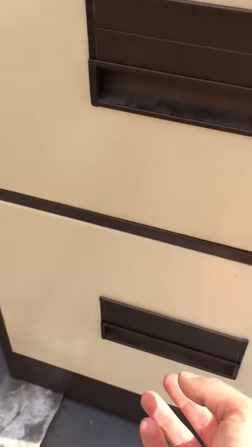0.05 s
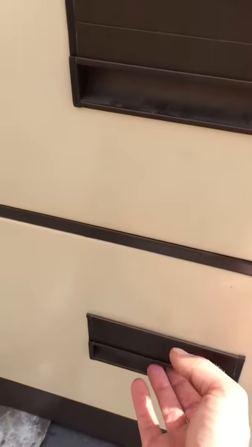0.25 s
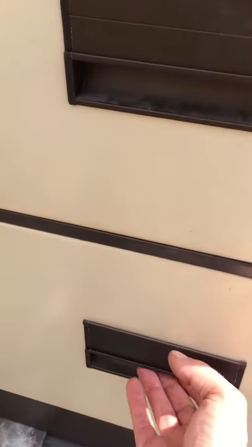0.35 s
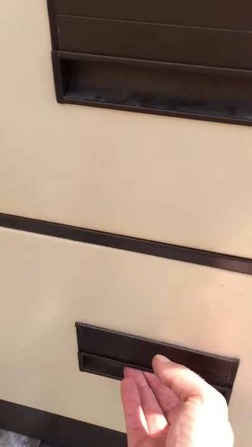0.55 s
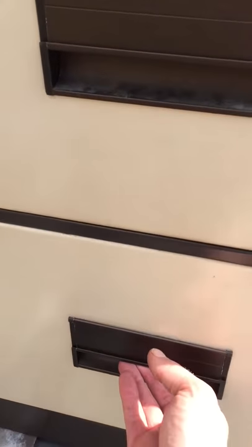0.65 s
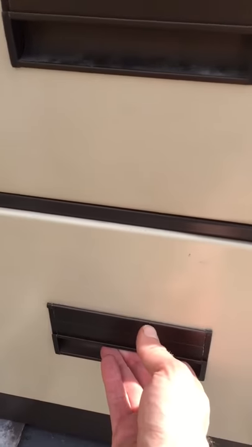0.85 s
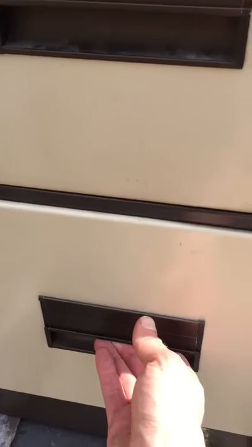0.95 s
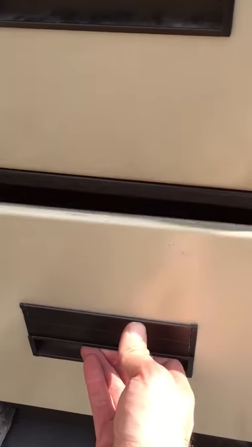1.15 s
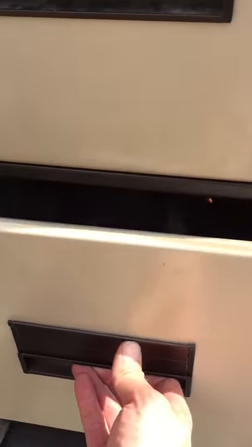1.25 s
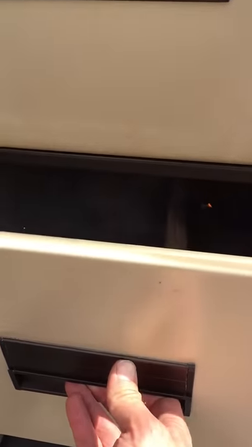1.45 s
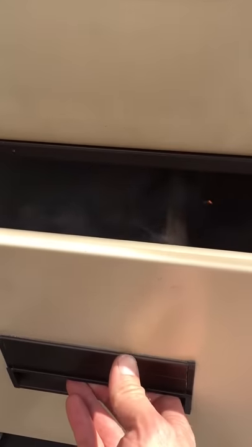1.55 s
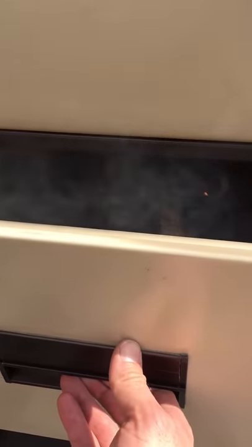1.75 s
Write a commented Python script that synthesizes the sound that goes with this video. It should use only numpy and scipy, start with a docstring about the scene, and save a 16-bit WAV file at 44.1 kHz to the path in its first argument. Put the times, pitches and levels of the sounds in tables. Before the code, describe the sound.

Ringing metal clanks from a cabinet handle and latch, then a hollow drawer rolling out.

```python
"""A steel filing cabinet, opened by hand, outdoors, close by.
The handle clanks on the drawer front and sets its spring singing; the latch lets go with a clang
and a rattle. Each contact rings the dense modes of the sheet steel plus the struck part's own.
The drawer rolls out, booming over bumps and scraping on grit, with one short runner squeak.
Embers inside tick faintly over a low outdoor rumble."""
import sys
import numpy as np
from scipy import signal
from scipy.fft import rfft, irfft
from scipy.io import wavfile
from scipy.ndimage import uniform_filter1d

SR = 44100
rng = np.random.default_rng(int(sys.argv[2]) if len(sys.argv) > 2 else 0)


def file_out(sig):
    """Save sig as 16-bit WAV at sys.argv[1]."""
    # one column per channel
    cols = np.atleast_2d(sig).T
    # limit, then scale
    lim = np.clip(cols, -1, 1)
    pcm = np.round(lim * 32767).astype(np.int16)
    wavfile.write(sys.argv[1], SR, pcm)


N = 79380
TIME_S = np.arange(N) / SR

# outdoor air spectrum: f/Hz, density/dB
AIR_SPECTRUM = [(20, -34.5), (60, 0.5), (220, -7), (450, -20), (1000, -23), (6000, -41.5), (15500, -46)]
# ember snaps: t/s, level/dB, f/Hz
EMBER_SNAPS = [(0.135, -50, 13700), (1.601, -47, 9400)]
# drawer travel: t/s, rumble level/dB, scrape level/dB
ROLL_LEVELS = [(.76, -65.5, -71.5), (0.842, -44.5, -40.5), (1.0, -44.5, -99), (1.112, -54, -57),
               (1.147, -41.5, -44), (1.199, -36, -46.5), (1.246, -31, -38), (1.3, -32.5, -41.5),
               (1.385, -29, -41.5), (1.53, -35.5, -51.5), (1.62, -37.5, -62.5), (1.8, -46, -91)]
# hollow drawer modes: f/Hz, relative level/dB, t60/s
BOX_MODES = [(65, -4, 0.067), (105.6, -2, 0.3), (147.4, -2, 0.05), (187.9, 0.5, 0.35), (223.4, 1, 0.1),
             (263.7, 1, 0.2), (334, 0, 0.035)]
# runner grit spectrum: f/Hz, density/dB
SCRAPE_SPECTRUM = [(200, -0.5), (800, 4.5), (1400, 0), (3200, -6.5), (5500, -24), (8000, -25), (15500, -37)]
# sheet steel spectrum: f/Hz, density/dB
SHEET_SPECTRUM = [(100, -18.5), (270, -15.5), (520, -8), (1280, -8), (1550, -4), (2100, 0), (2900, -5),
                  (4900, -12), (5600, -10.5), (7800, -17), (8700, -15), (10500, -23.5), (15500, -23.5)]
# sheet steel decay: f/Hz, t60/s
SHEET_DECAY = [(150, .25), (600, .13), (1800, .2), (4000, .21), (6500, .19), (9500, .135), (15000, .115)]
# sheet antiresonances: f/Hz
ANTIRESONANCES_HZ = [520, 920, 1310, 2380, 2880, 4130, 4780, 8030]
# clear modes, by part: f/Hz, relative level/dB, t60/s
CLEAR_MODES = { "handle": [(265, -12, .1), (325, -14, .14), (1008, -18, .28), (1145, -19, .5),
               (1462, -12, .22), (1512, -10, .25), (1590, -11, .24), (1670, -8, .2), (1935, -7, .2),
               (2168, 3, .06), (2592, -12, .22), (3943, -14, .2)], "stop": [(345, -14, .33),
               (1013, -11, .2), (1090, 0, .06), (1145, -9, .33), (1586, -6, .3), (1672, -5, .34),
               (1760, 0, .1), (1957, -6, .26), (2036, -8, .5), (2487, -9, .25), (2750, -19, .45),
               (3077, -9, .25), (3320, -17, .45), (3608, -10, .36), (5249, -17, .4)],
               "latch": [(745, 0, .055), (1390, 9, .04), (1863, -19, .5), (2033, -14, .5), (2297, -2, .28),
               (2424, -10, .22), (3068, -7, .33), (3658, -12, .55), (3864, -15, .42), (5497, -21, .7)],
               "keeper": [(1330, 7, .04), (2280, -3, .2)], "grip": [], "runner": []}
# weaker overtones, by part: f/Hz
OVERTONES_HZ = { "grip": [1257, 1668, 1717, 1897, 2683, 2928, 4629, 6042, 6915], "handle": [1991, 2559,
                3245, 3644, 4377, 4503, 5369, 5905, 6034, 6729, 7105, 8029, 8500], "stop": [2563, 3246,
                4645, 5334, 6333, 6495], "latch": [1140, 1522, 4298, 4365, 5243, 5780, 6029, 6871, 7542],
                "keeper": [872, 1194, 1549, 2634, 2781, 3041, 6575], "runner": []}
# overtone offset from the sheet spectrum, by part: level/dB
OVERTONE_OFFSET_DB = {"grip": -2, "handle": -10, "stop": -6, "latch": -7, "keeper": -4}
# metal contacts: t/s, part, level/dB, bass/dB, clunk/dB, treble/dB, ring/dB
CONTACTS = [(.164, "grip", -42, 11, 1, -14.5, -2), (0.1948, "grip", -26, -11, -9, -1.5, -11),
            (0.2001, "grip", -25, -1, 6, 6.5, 2), (0.2222, "grip", -34.5, 1, 2.5, 10.5, -1),
            (0.2607, "handle", -14.5, -1, -0.5, 2.5, 1), (0.4134, "stop", -27, 8.5, 10, -8.5, -11.5),
            (0.4237, "stop", -20.5, -6, 1.5, -9.5, -1.5), (.454, "stop", -24, 1, -13, -10, -25),
            (.752, "runner", -51.5, -23, 12, -19, 4.5), (0.844, "latch", -19.5, 4.5, 5.5, -3, 1.5),
            (.903, "latch", -29.5, 12, 6, -12, -10), (.920, "latch", -30.5, 5, 7, -7.5, -26),
            (.9445, "keeper", -30.5, -17, 4, -8, 2), (.958, "latch", -29, -4, 1.5, -9, -4.5),
            (.973, "latch", -34.5, 0, 6, -1, -6), (1.0235, "latch", -36.5, -14, 11.5, 1, -3),
            (1.152, "runner", -46.5, 11, -18, -1, -4), (1.22, "runner", -38.5, 12, 3, -10.5, 0),
            (1.243, "runner", -36, 10, 6, -24, 0), (1.314, "runner", -52, 3, 0, 11, 0)]


def from_db(db):
    """Decibels to gain."""
    return 10 ** (np.asarray(db) / 20)


def unit_rms(x):
    """Scale to RMS 1."""
    return x / np.sqrt(np.mean(x ** 2) + 1e-20)


def at_hz(points, hz):
    """Interpolate a table over log frequency."""
    table_hz, values = np.transpose(points)
    return np.interp(np.log(np.maximum(hz, 1)), np.log(table_hz), values)


def colour(x, spectrum):
    """Apply a spectrum; RMS 1."""
    gain = from_db(at_hz(spectrum, np.fft.rfftfreq(N, 1 / SR)))
    return unit_rms(irfft(rfft(x) * gain, N))


def decay(t, t60_s):
    """Exponential fall, 60 dB per t60_s."""
    return np.exp(-float(np.log(1000)) * t / t60_s)


def add(out, start_s, sound):
    """Mix in at start_s."""
    i = int(start_s * SR)
    out[i:i + len(sound)] += sound[:N - i]


def clicks(per_s, spread_db):
    """Random impulses of uneven size."""
    sizes = from_db(spread_db * np.minimum(rng.exponential(1, N), 4)) * rng.choice([-1, 1], N)
    return sizes * (rng.random(N) < per_s / SR)


def scatter(count, spread_db):
    """Log-normal factors, clipped at 2 sigma."""
    return from_db(spread_db * np.clip(rng.standard_normal(count), -2, 2))


def air(level_db=-52.5):
    """Low outdoor rumble, faint hiss."""
    return from_db(level_db) * colour(rng.standard_normal(N), AIR_SPECTRUM)


def embers(tau_s=0.0045):
    """Tiny bright snaps: fast-decaying bursts of band noise."""
    out, t = np.zeros(N), TIME_S[:SR // 20]
    for start_s, db, hz in EMBER_SNAPS:
        band = signal.butter(1, [0.46 * hz, min(1.6 * hz, 20000)], "band", fs=SR, output="sos")
        snap = unit_rms(signal.sosfilt(band, rng.standard_normal(len(t))))
        add(out, start_s, from_db(db) * snap * np.exp(-t / tau_s))
    return out


def friction(peak_s, half_width_s, hz, bandwidth_hz, level_db):
    """Rubbing swells and fades in one resonance."""
    radius = np.exp(-np.pi * bandwidth_hz / SR)
    feedback = [1, -2 * radius * np.cos(2 * np.pi * hz / SR), radius ** 2]
    tone = signal.lfilter([1, 0, -1], feedback, rng.standard_normal(N))
    swell = np.exp(-((TIME_S - peak_s) / half_width_s) ** 2)
    return from_db(level_db) * unit_rms(tone) * swell


def drawer():
    """Runner bumps make the box boom, duller as it slows; grit scrapes under the rollers."""
    times_s, rumble_db, scrape_db = np.transpose(ROLL_LEVELS)
    rumble_db = np.interp(TIME_S, times_s, rumble_db)
    scrape_db = np.interp(TIME_S, times_s, scrape_db)
    tilt_db_per_octave = 0.52 * (rumble_db - rumble_db.max())
    boom, t = np.zeros(N), TIME_S[:SR // 2]
    for hz, db, t60_s in BOX_MODES:
        bumps = clicks(per_s=500, spread_db=2)
        ring = signal.fftconvolve(bumps, np.sin(2 * np.pi * hz * t) * decay(t, t60_s))[:N]
        boom += unit_rms(ring) * from_db(db - 8 + tilt_db_per_octave * np.log2(hz / 140))
    scrape = colour(clicks(per_s=2200, spread_db=4), SCRAPE_SPECTRUM)
    return from_db(rumble_db) * boom + from_db(scrape_db) * scrape


def spring(hz=677.6, level_db=-39.5, struck_s=0.262, caught_s=1.0):
    """Handle spring: a pure tone from the hardest clank until the latch lets go."""
    t = np.maximum(TIME_S - struck_s, 0)
    tone = np.sin(2 * np.pi * hz * t) * decay(t, t60_s=4.7)
    damping = decay(np.maximum(TIME_S - caught_s, 0), t60_s=0.14)
    return from_db(level_db) * tone * damping


def sheet_modes(count=520, gap_db=-10, gap_width_hz=65):
    """Dense, uneven plate modes, hollowed at the antiresonances; each in sine and cosine phase."""
    hz = 100 + 15900 * ((np.arange(count) + rng.random(count)) / count) ** 1.5
    t60_s = at_hz(SHEET_DECAY, hz) * scatter(count, spread_db=1.3)
    gain = scatter(count, spread_db=3.8)
    gain /= np.sqrt(uniform_filter1d(gain ** 2, size=9))
    gain *= from_db(at_hz(SHEET_SPECTRUM, hz)) * hz ** (1 / 6)   # offsets the sparser high modes
    gaps = sum(np.exp(-((hz - gap_hz) / gap_width_hz) ** 2) for gap_hz in ANTIRESONANCES_HZ)
    gain *= from_db(gap_db * gaps)
    gain /= np.sqrt(np.sum(gain ** 2) / 2)
    t = TIME_S[:SR // 2]
    angle = 2 * np.pi * hz[:, None] * t
    fade = decay(t, t60_s[:, None])
    return hz, gain, np.sin(angle) * fade, np.cos(angle) * fade


def part_modes(part):
    """A part's clear modes, plus overtones that take the sheet's colour and outlast its ring."""
    overtones = [(hz, OVERTONE_OFFSET_DB[part] + at_hz(SHEET_SPECTRUM, hz), 1.5 * at_hz(SHEET_DECAY, hz))
                 for hz in OVERTONES_HZ[part]]
    return CLEAR_MODES[part] + overtones


def knock(sheet, modes, bass_db, clunk_db, treble_db, ring_db, loss_db_per_s):
    """One contact: the sheet cracks and rings in the blow's colour; the struck part adds its modes."""
    attack_s, crack_s, crack_db = 0.0022, 0.011, -2
    sheet_hz, gain, sines, cosines = sheet
    blow_spectrum = [(280, bass_db), (800, clunk_db), (1900, 0), (10000, treble_db)]
    gain = gain * from_db(at_hz(blow_spectrum, sheet_hz))
    phase = 2 * np.pi * rng.random(len(sheet_hz))
    plate = (gain * np.cos(phase)) @ sines + (gain * np.sin(phase)) @ cosines
    t = TIME_S[:len(plate)]
    crack = 1 + from_db(crack_db) * np.exp(-t / crack_s)
    plate *= crack * from_db(-loss_db_per_s * t)
    ring = np.zeros(len(t))
    for k, (hz, db, t60_s) in enumerate(modes):
        mode_db = db + ring_db + at_hz([(3000, 0), (10000, treble_db)], hz)
        ring += (-1) ** k * from_db(mode_db) * decay(t, t60_s) * np.sin(2 * np.pi * hz * t)
    return (plate + ring) * (1 - np.exp(-t / attack_s))


def clanks(grip_loss_db_per_s=238, pull_loss_db_per_s=9):
    """Handle, stop, latch, keeper and runners strike one cabinet; the hand's grip and pull damp it."""
    free_s, free_ramp_s, free_db = 1.035, 0.0083, -5   # ringing drops as the latch clears
    out, sheet = np.zeros(N), sheet_modes()
    for start_s, part, db, *blow_db in CONTACTS:
        loss_db_per_s = pull_loss_db_per_s if part in ("latch", "keeper", "runner") else 0
        clank = knock(sheet, part_modes(part), *blow_db, loss_db_per_s)
        t = TIME_S[:len(clank)]
        if part == "grip":
            clank *= from_db(-grip_loss_db_per_s * t)
        if part in ("latch", "keeper"):
            freed = np.clip((start_s + t - free_s) / free_ramp_s, 0, 1)
            clank *= from_db(free_db * freed)
        add(out, start_s, from_db(db) * clank)
    return out


def scene():
    """Mono mix; the front panel flexes under the pull and a runner squeaks."""
    squeak = friction(peak_s=1.26, half_width_s=0.02, hz=3140, bandwidth_hz=90, level_db=-47)
    flex = friction(peak_s=0.712, half_width_s=0.02, hz=325, bandwidth_hz=25, level_db=-52)
    return (clanks() + spring() + drawer() + squeak + flex + embers() + air())[None]


def record(dry, low_cut_hz=39, high_cut_hz=15900, ceiling=0.85):
    """High-pass, soft clip, steep low-pass."""
    high_pass = signal.butter(4, low_cut_hz, "high", fs=SR, output="sos")
    low_pass = signal.ellip(10, 0.1, 80, high_cut_hz, fs=SR, output="sos")
    rounded = ceiling * np.tanh(signal.sosfilt(high_pass, dry) / ceiling)
    return signal.sosfilt(low_pass, rounded)


dry = scene()
out = record(dry)
file_out(out)
```